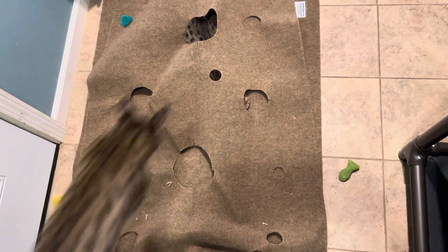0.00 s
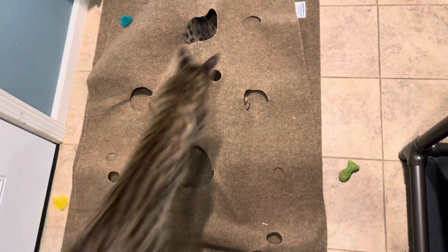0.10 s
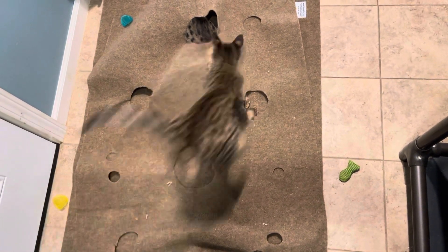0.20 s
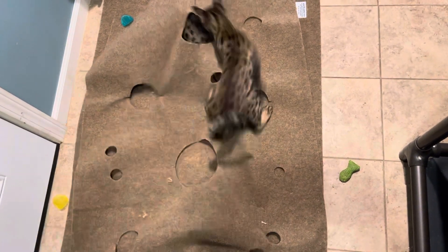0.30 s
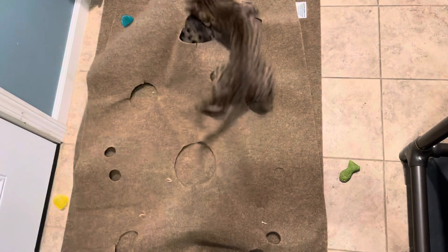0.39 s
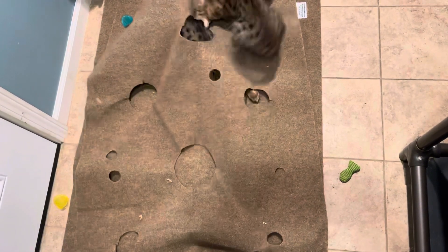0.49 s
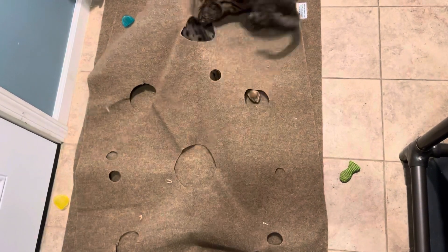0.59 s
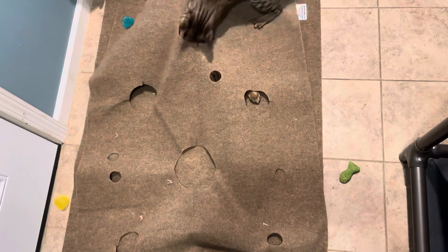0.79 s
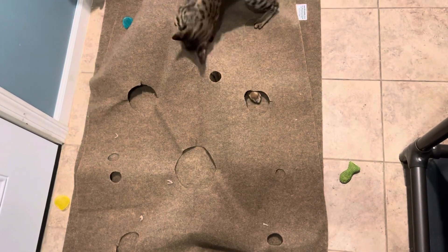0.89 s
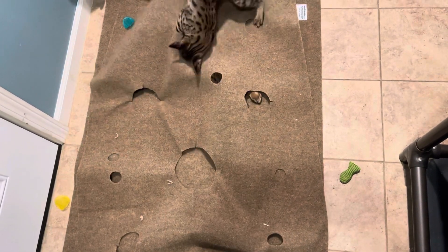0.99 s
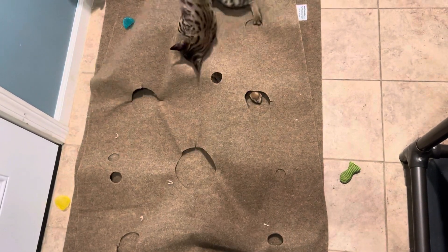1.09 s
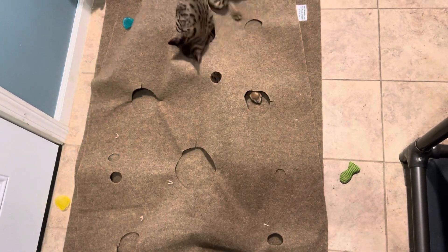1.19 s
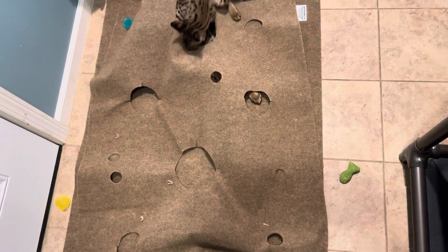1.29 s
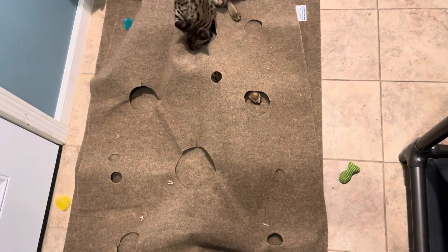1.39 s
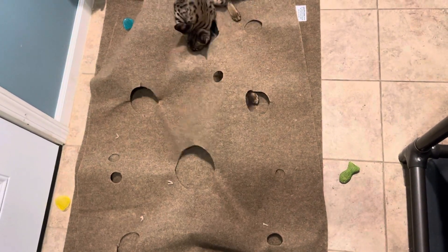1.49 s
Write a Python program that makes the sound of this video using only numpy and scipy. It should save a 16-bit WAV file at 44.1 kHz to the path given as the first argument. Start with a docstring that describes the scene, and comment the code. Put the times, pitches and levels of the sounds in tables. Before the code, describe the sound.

After a brief quiet hum, paws land hard on a rug over a tiled floor, slapping and scraping in quick succession; then only faint claw ticks, a tiny squeak and rustle remain, with short indoor echo.

```python
"""Kittens on a loose rug.

Kittens dash over a stiff play rug on a tiled floor in a small, live room, above a low machine hum.
Thuds, rug slaps and early echoes are damped sines falling in pitch; slaps and echoes add a noise crack.
Scuffs, rustle, rug shifts and a faint hiss are coloured random snaps; claw squeaks are wavering modes.
All these but the hum also feed a tail of noise that decays band by band."""
import sys
import numpy as np
from scipy import signal
from scipy.fft import rfft, irfft
from scipy.io import wavfile

SR = 44100
rng = np.random.default_rng(int(sys.argv[2]) if len(sys.argv) > 2 else 0)


def persist_wave(psi):
    """Save psi, clipped to +-1, as 16-bit WAV."""
    counts = np.round(np.clip(psi, -1, 1) * 32767).astype(np.int16)
    wavfile.write(sys.argv[1], SR, np.atleast_2d(counts).T)


N = 66150
TIME_S = np.arange(N) / SR


def from_db(db):
    """Decibels to amplitude gain."""
    return 10 ** (np.asarray(db) / 20)


def rms_one(x):
    """Scale to unit rms."""
    return x / np.sqrt(np.mean(x ** 2) + 1e-20)


def at_hz(points, hz):
    """Interpolate a table on a log-frequency axis."""
    f_hz, value = np.transpose(points)
    return np.interp(np.log(hz + 1), np.log(f_hz + 1), value)


def bins_hz(x):
    """Bin frequencies of the spectrum of x."""
    return np.fft.rfftfreq(x.shape[-1], 1 / SR)


def colour(x, spectrum, tilt_db_per_oct=0):
    """Filter by a spectrum plus a tilt, nearly constant per octave above its first point; rms 1."""
    hz = bins_hz(x)
    octaves = np.log2(1 + hz / spectrum[0][0])
    gain = from_db(at_hz(spectrum, hz) + tilt_db_per_oct * octaves)
    return rms_one(irfft(rfft(x) * gain, N))


def drift(rate_hz):
    """Random curve: straight lines between normal knots of spread 1."""
    knots = rng.standard_normal(1000)
    return np.interp(TIME_S * rate_hz, np.arange(len(knots)), knots)


def dying(start_s, t60_s):
    """Exponential decay from start_s, 60 dB per t60_s."""
    age_s = TIME_S - start_s
    return (age_s >= 0) * np.exp(-np.log(1000) * np.maximum(age_s, 0) / max(t60_s, 1e-4))


def stroke(start_s, attack_s, hold_s, release_t60_s):
    """Envelope: linear attack, hold, exponential release."""
    end_s = start_s + attack_s + hold_s
    attack = np.clip((TIME_S - start_s) / max(attack_s, 1e-4), 0, 1)
    return attack * ((TIME_S < end_s) + dying(end_s, release_t60_s))


# left-right likeness of diffuse sound: f/Hz, coherence/1
COHERENCE = [(120, 1), (400, 0.89), (850, 0.057), (1700, 0.9), (2400, 0.51), (3300, 0.13), (4300, 0.85),
             (5000, 0.252), (5450, 0.66), (6000, 0.56), (6900, 0.67), (9200, 1), (11000, 0.51)]


def diffuse():
    """White stereo noise; the mid/side balance sets channel coherence against frequency."""
    mid, side = rfft(rng.standard_normal((2, N)))
    alike = np.clip(at_hz(COHERENCE, bins_hz(TIME_S)), 0, 1)
    common = np.sqrt((1 + alike) / 2) * mid
    opposed = np.sqrt((1 - alike) / 2) * side * [[1], [-1]]
    return irfft(common + opposed, N)


# machine hum lines, mean level as rms: f/Hz, level/dB
HUM_LINES = [(60, -56.5), (74, -49.5), (143, -60.5), (210, -66)]
HUM_WAVER_DB, HUM_WANDER_RAD = 2.5, 1


def hum():
    """Machine tones: sines with wavering level and wandering phase."""
    total = 0
    for hz, db in HUM_LINES:
        level = from_db(db + HUM_WAVER_DB * drift(4.8))
        cycles = hz * TIME_S + rng.random()
        total = total + level * np.sin(2 * np.pi * cycles + HUM_WANDER_RAD * drift(7.15))
    return np.sqrt(2) * total  # rms to peak


# room noise, relative density: f/Hz, level/dB per Hz
AIR_COLOUR = [(20, -31), (45, -0.5), (70, 6.5), (110, -9.5), (200, -13), (330, -18.5), (500, -34),
              (900, -43.5), (2000, -55), (5000, -57.5), (12000, -65.5)]
AIR_RMS_DB = -46.5


def air():
    """Room noise: coloured diffuse noise at steady level."""
    return from_db(AIR_RMS_DB) * colour(diffuse(), AIR_COLOUR)


FIBRES_PER_S, FIBRE_SPREAD_DB = 5000, 3


def fibres():
    """Tiny snaps, as of pile fibres: random impulses of uneven size and either sign."""
    size_db = FIBRE_SPREAD_DB * np.minimum(rng.exponential(1, N), 4)
    snaps = from_db(size_db) * rng.choice([-1, 1], N)
    return snaps * (rng.random(N) < FIBRES_PER_S / SR)


def soft_noise(level, spectrum, tilt_db_per_oct=0):
    """Coloured snaps under a level curve held beyond its end points."""
    envelope = from_db(np.interp(TIME_S, *np.transpose(level)))
    return envelope * colour(fibres(), spectrum, tilt_db_per_oct)


# rug shifts on the tiles, level curve: t/s, level/dB
SHIFT_CURVE = [(0.6, -65), (0.8, -72), (1.0, -65.5), (1.1, -72), (1.25, -58.5), (1.5, -60)]
# rug on tiles, relative density: f/Hz, level/dB per Hz
SHIFT_COLOUR = [(100, 2), (220, 1.5), (420, -2), (700, -23), (1300, -66), (2500, -85)]


def rug_shift():
    """Rug slides on tiles: low-coloured snaps."""
    return soft_noise(SHIFT_CURVE, SHIFT_COLOUR)


# faint mid-band hiss, level curve: t/s, level/dB
HISS_CURVE = [(0.014, -100), (0.02, -78), (0.118, -99), (0.124, -67), (0.15, -71.5), (0.2, -72),
              (0.23, -74)]
# faint mid-band hiss, relative density: f/Hz, level/dB per Hz
HISS_COLOUR = [(900, -28), (1620, 2), (2200, -0.5), (3500, -9), (5000, -29.5)]


def soft_hiss():
    """Faint mid-band hiss: dense coloured snaps."""
    return soft_noise(HISS_CURVE, HISS_COLOUR)


# kittens wrestle, level curve: t/s, level/dB
RUSTLE_CURVE = [(0.17, -100), (0.23, -45.5), (0.75, -58), (0.87, -64.5), (1.08, -67), (1.2, -60),
                (1.42, -66), (1.5, -82)]
# fibres under a claw, relative density: f/Hz, level/dB per Hz
PILE_COLOUR = [(100, -6), (300, -3), (700, -0.5), (1100, -2.5), (1800, -6.5), (2600, -2), (4000, -9.5),
               (6200, -11.5), (8000, -9), (10200, -7), (11200, -18.5), (12500, -53)]


def rustle():
    """Wrestling kittens rub the pile: fibre snaps, tilted down."""
    return soft_noise(RUSTLE_CURVE, PILE_COLOUR, tilt_db_per_oct=-1.62)


# pile scuffed: t/s, attack/s, hold/s, release t60/s, level/dB, tilt/dB per octave, room send/dB
SCUFF_STROKES = [(0.205, 0.0058, 0.066, 0.071, -43.5, -3.5, -4.5),
                 (0.271, 0.0053, 0.023, 0.028, -32.5, -2, 1), (0.409, 0.00099, 0.03, 0.23, -47.5, 0, 0),
                 (0.523, 0.015, 0.077, 0.16, -38.5, 0, -3), (0.587, 0.0026, 0.0032, 0.0081, -40, 3, -5),
                 (0.606, 0.0027, 0.0019, .012, -31.5, 9, -10),
                 (0.733, 0.004, 0.0033, 0.024, -48.5, 11, 0.5), (0.89, 0.0022, 0.012, 0.048, -50.5, 4, 3),
                 (0.933, 0.011, 0.046, 0.11, -57.5, 0.5, -5), (1.093, 0.055, 0.038, 0.11, -64, 3, 6),
                 (1.165, 0.00041, 0.0023, 0.0045, -44.5, 2.5, -19),
                 (1.459, 0.008, 0.014, 0.086, -65.5, -0.5, 5)]
SCUFF_JITTER_DB = 3


def scuffs():
    """Paws drag through the pile: jittered fibre snaps per stroke; (sound, room_db) pairs."""
    snaps = fibres() * from_db(SCUFF_JITTER_DB * drift(150))
    sounds = []
    for start_s, attack_s, hold_s, release_s, db, tilt_db_per_oct, room_db in SCUFF_STROKES:
        envelope = from_db(db) * stroke(start_s, attack_s, hold_s, release_s)
        sounds.append((envelope * colour(snaps, PILE_COLOUR, tilt_db_per_oct), room_db))
    return sounds


CONTACT_CYCLES = 0.62  # rise time in cycles of the settled pitch
BEND_RISE, BEND_S = 0.76, 0.00047  # higher bending waves arrive first: extra pitch share, settling time
CRACK_T60_S = 0.008


def contact(start_s, db, hz, t60_s, crack=0):
    """Damped sine settling down in pitch, plus an optional noise crack, with a linear rise."""
    age_s = np.maximum(TIME_S - start_s, 0)
    cycles = hz * (age_s + BEND_RISE * BEND_S * (1 - np.exp(-age_s / BEND_S)))
    rise = np.clip(age_s * hz / CONTACT_CYCLES, 0, 1)
    ring = np.sin(2 * np.pi * cycles) * dying(start_s, t60_s)
    return from_db(db) * rise * (ring + crack * dying(start_s, CRACK_T60_S))


# rug slaps tiles, claws tap, early echoes off a wall:
# t/s, level/dB, f/Hz, t60/s, room send/dB, crack re level/dB
SLAP_HITS = [(0.2124, -29.5, 1596, 0.04, -2.5, 5), (0.2795, -14, 1830, 0.0091, -4, -20),
             (0.2804, -5.5, 1364, 0.0054, -13, -9), (0.287, -23.5, 3140, 0.0079, -8.5, -8),
             (0.2915, -22.5, 1650, 0.019, -3, 0.5), (0.4140, -12, 1370, 0.0051, -3.5, -8),
             (0.4196, -26.5, 3010, 0.011, 3, -12), (0.4229, -32.5, 1490, 0.0052, 1.5, -3.5),
             (0.4272, -26.5, 2510, 0.0082, -6, -9.5), (0.5327, -12.5, 1280, 0.0063, -9.5, -8),
             (0.5402, -33, 2410, 0.012, 9, 3), (0.5965, -26, 3190, 0.0058, -0.5, -17),
             (0.9545, -45, 1910, 0.022, -18, -7), (0.9816, -44, 1190, 0.0015, -8.5, -7),
             (1.1420, -51.5, 1000, 0.0058, -12, -16), (1.1662, -40, 1750, 0.01, -8, -21)]
# crack of the stiff backing, relative density: f/Hz, level/dB per Hz
CRACK_COLOUR = [(300, -5.5), (900, 8.5), (1900, 5), (2900, -14.5), (4100, 0.5), (5200, -8), (8000, -41),
                (10500, -22), (12300, -26)]


def slaps():
    """Slaps, claw taps and early echoes: damped ring plus noise crack; (sound, room_db) pairs."""
    crack = colour(rng.standard_normal(N), CRACK_COLOUR)
    return [(contact(start_s, db, hz, t60_s, from_db(crack_db) * crack), room_db)
            for start_s, db, hz, t60_s, room_db, crack_db in SLAP_HITS]


# paws and bodies land on the padded floor: t/s, level/dB, f/Hz, t60/s, room send/dB
THUD_HITS = [(0.221, -25, 320, 0.035, -5.5), (0.2310, -31, 540, 0.086, -3.5), (0.232, -31, 101, 0.12, -6),
             (0.239, -27, 228, 0.052, -8), (0.2725, -23.5, 725.5, 0.18, -6),
             (0.2728, -18.5, 406, 0.017, -3.5), (0.2790, -23.5, 129, 0.064, 0), (0.28, -27, 215, 0.028, -6),
             (0.292, -24, 160, 0.063, -10), (0.2990, -23, 547, 0.021, -1.5), (0.3100, -28, 94, 0.083, -24),
             (0.3215, -24.5, 630, 0.012, -8), (0.3670, -30.5, 330, 0.018, -31),
             (0.4150, -23.5, 640, 0.013, -41), (0.556, -39, 160, 0.041, -9)]


def thuds():
    """Paws and bodies land: damped rings, no crack; (sound, room_db) pairs."""
    return [(contact(start_s, db, hz, t60_s), room_db)
            for start_s, db, hz, t60_s, room_db in THUD_HITS]


# claw catches the backing: t/s, hold/s, level/dB
SQUEAK_CATCHES = [(0.901, 0.0069, -54), (0.922, 0.0047, -61.5)]
# modes of the caught backing: f/Hz, level/dB, t60/s
BACKING_MODES = [(602, -4, 0.14), (1229, -3.5, 0.07), (2198, 1, 0.11), (2676, -9.5, 0.065),
                 (3045, -10, 0.086), (5400, -2, .04), (6435, 2, 0.028)]
SQUEAK_ATTACK_S, SQUEAK_PITCH_WAVER = 0.0015, 0.0079  # waver as share of pitch


def squeaks():
    """Slipping claw drives unsteady modes, which ring on after the hold."""
    total = 0
    for start_s, hold_s, db in SQUEAK_CATCHES:
        for hz, mode_db, t60_s in BACKING_MODES:
            pitch_hz = hz * (1 + SQUEAK_PITCH_WAVER * drift(300))
            tone = np.sin(2 * np.pi * np.cumsum(pitch_hz) / SR)
            envelope = stroke(start_s, SQUEAK_ATTACK_S, hold_s, t60_s)
            total = total + from_db(db + mode_db) * envelope * tone
    return total


# reverberation: f/Hz, t60/s
ROOM_DECAY = [(100, 0.41), (300, 0.41), (700, 0.49), (2000, 0.41), (5000, 0.39), (11000, 0.22)]
FIRST_ECHO_S, ECHO_BUILD_S = 0.0018, 0.00062


def room(x):
    """Reflections off tiles and walls: convolution with diffuse noise decaying per band."""
    hz, noise, tail = bins_hz(TIME_S), rfft(diffuse()), 0
    for k, (_, t60_s) in enumerate(ROOM_DECAY):
        band = [(f_hz, j == k) for j, (f_hz, _) in enumerate(ROOM_DECAY)]  # overlapping crossfades
        tail = tail + irfft(noise * at_hz(band, hz), N) * dying(0, t60_s)
    tail = tail * np.clip((TIME_S - FIRST_ECHO_S) / ECHO_BUILD_S, 0, 1)
    unit_energy = rms_one(tail) / np.sqrt(N)
    return signal.fftconvolve(x[None], unit_energy, axes=1)[:, :N]


SOFT_ROOM_DB, SQUEAK_ROOM_DB = -0.5, -3


def scene():
    """Direct sounds plus their room tail, over hum and room noise."""
    soft = rug_shift() + soft_hiss() + rustle()
    sounds = [(soft, SOFT_ROOM_DB)] + scuffs() + slaps() + thuds() + [(squeaks(), SQUEAK_ROOM_DB)]
    direct = sum(sound for sound, _ in sounds)
    room_send = sum(from_db(room_db) * sound for sound, room_db in sounds)
    return direct + room(room_send) + hum() + air()


# signed left-right phase difference of the stereo processing: f/Hz, phase/rad
STEREO_PHASE = [(0, 0), (860, -0.6), (2240, 0.3), (3270, -0.6), (4130, -0.5), (4740, -3.1), (5170, -2.6),
                (5680, -0.1), (6200, 0.2), (8440, 2.9), (9560, 3.3), (11300, 5.2), (11700, 6.2),
                (12700, 6.3)]
CUTOFF_HZ = 12700


def record(dry):
    """Stereo processing: signed phase difference split between channels, then a steep low-pass."""
    padded = np.pad(dry, ((0, 0), (0, N)))
    phase_rad = np.interp(bins_hz(padded), *np.transpose(STEREO_PHASE))
    turn = np.exp(0.5j * phase_rad * np.array([[1], [-1]]))
    pair = irfft(rfft(padded) * turn)[:, :N]
    # order 10, 0.2 dB ripple, 80 dB stopband
    low_pass = signal.ellip(10, 0.2, 80, CUTOFF_HZ, fs=SR, output="sos")
    return signal.sosfilt(low_pass, pair)


dry = scene()
out = record(dry)
persist_wave(out)
```